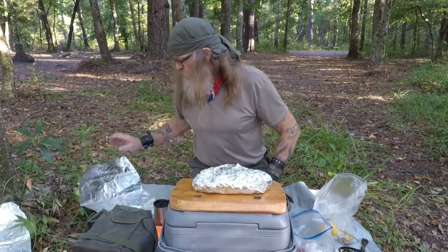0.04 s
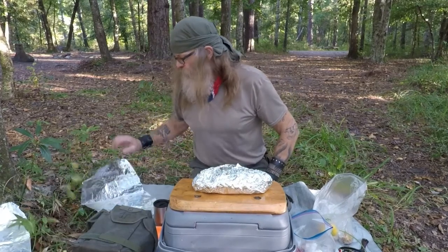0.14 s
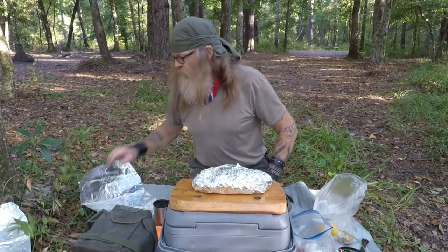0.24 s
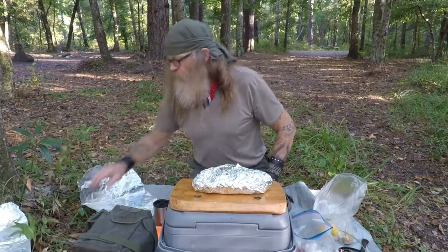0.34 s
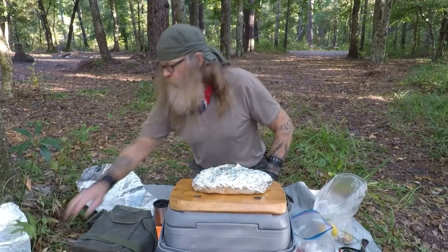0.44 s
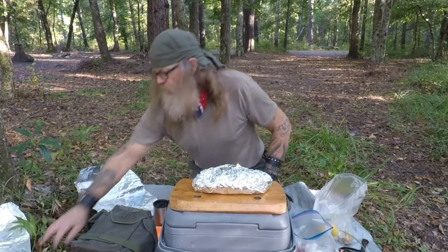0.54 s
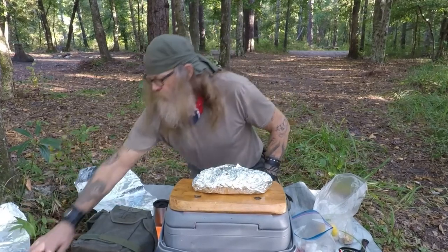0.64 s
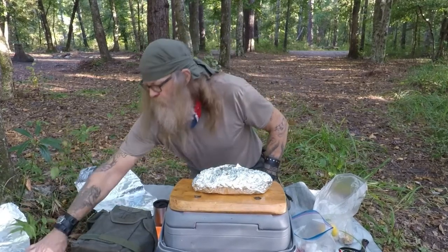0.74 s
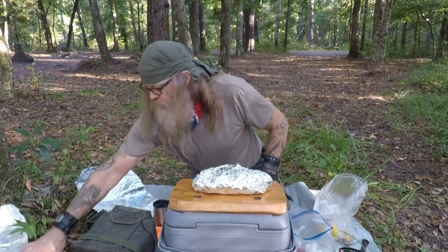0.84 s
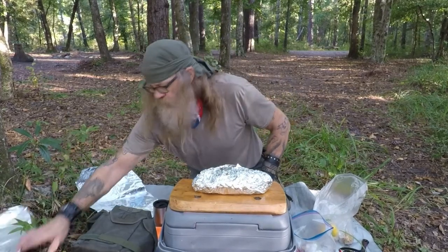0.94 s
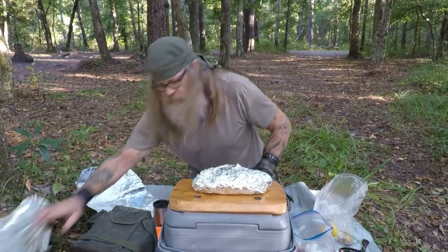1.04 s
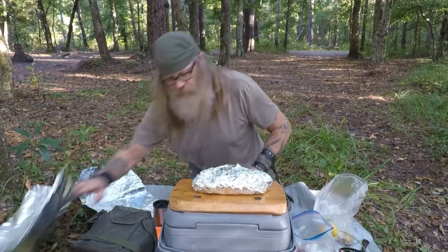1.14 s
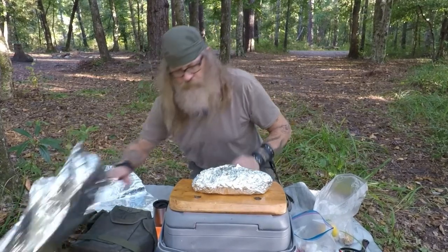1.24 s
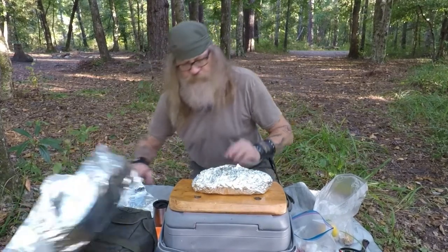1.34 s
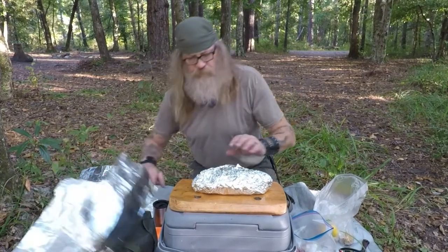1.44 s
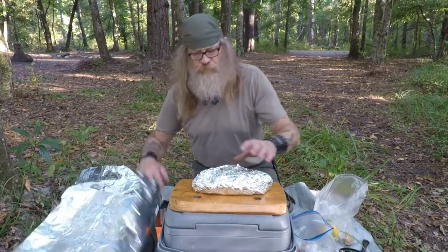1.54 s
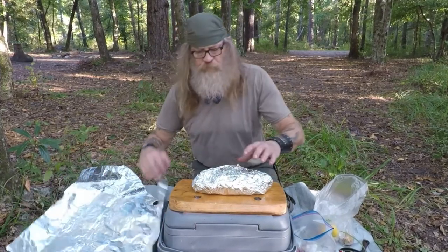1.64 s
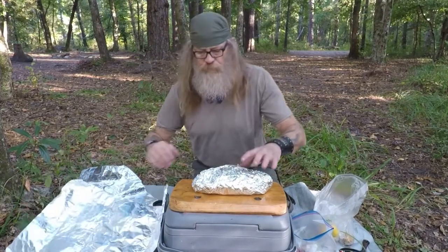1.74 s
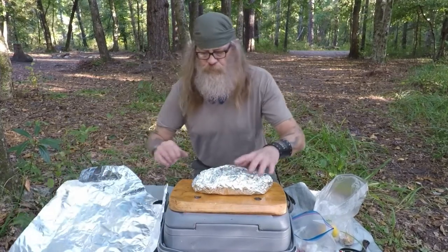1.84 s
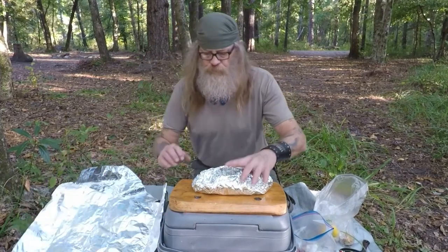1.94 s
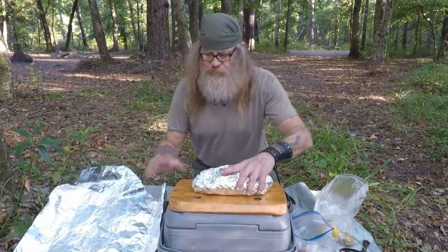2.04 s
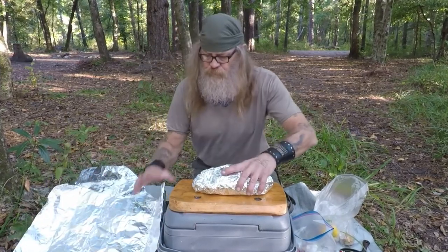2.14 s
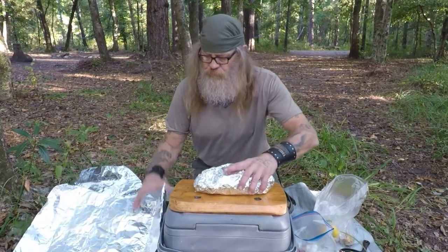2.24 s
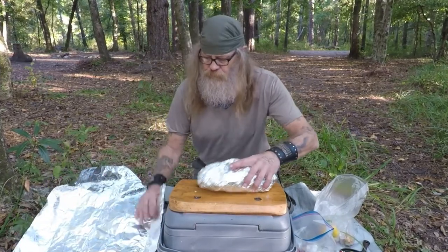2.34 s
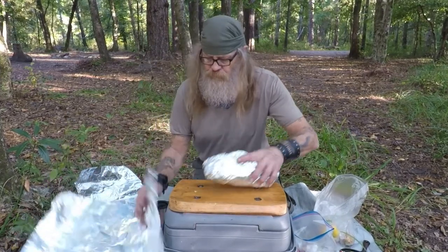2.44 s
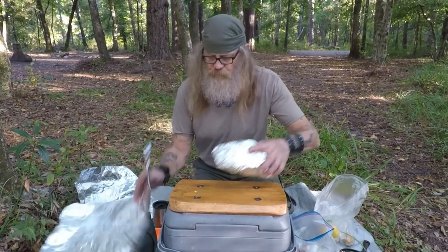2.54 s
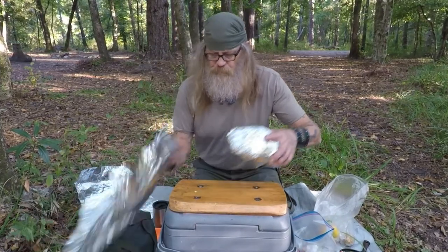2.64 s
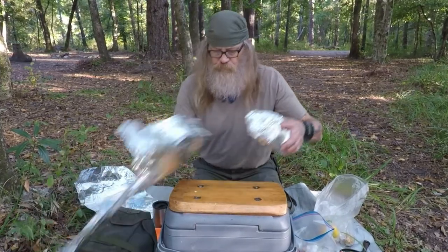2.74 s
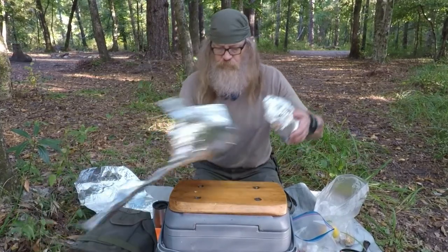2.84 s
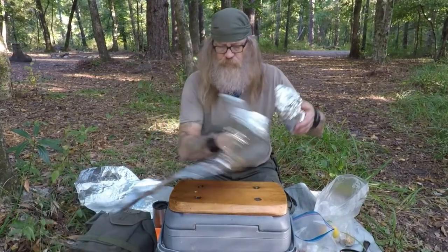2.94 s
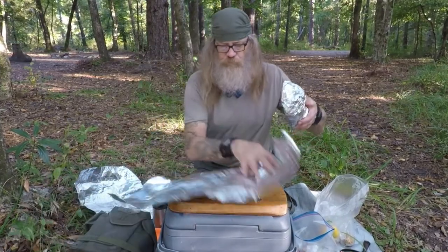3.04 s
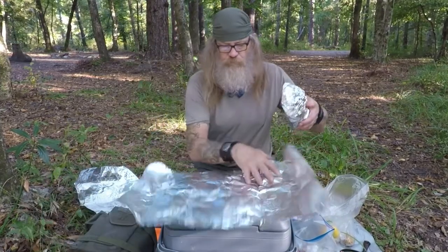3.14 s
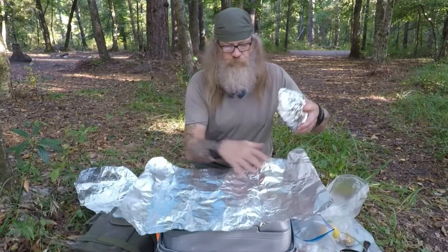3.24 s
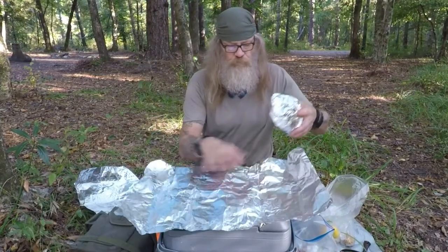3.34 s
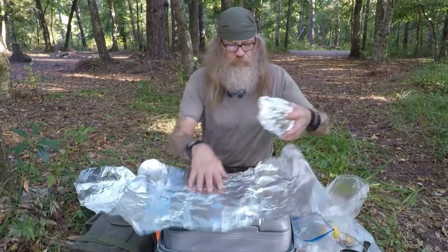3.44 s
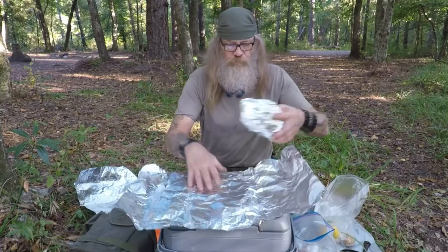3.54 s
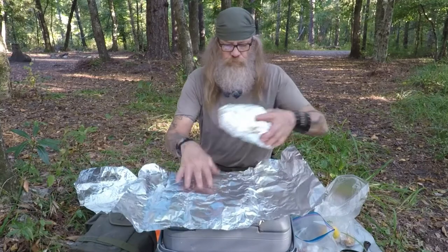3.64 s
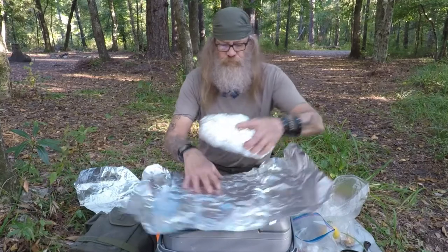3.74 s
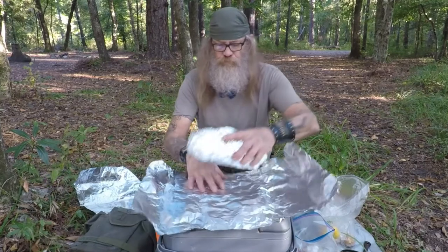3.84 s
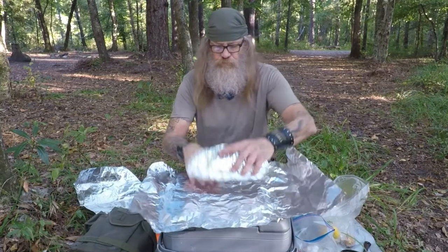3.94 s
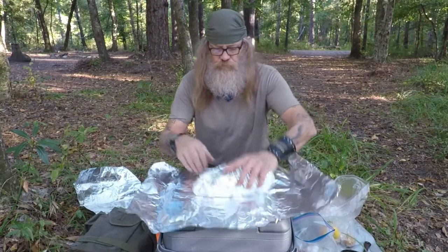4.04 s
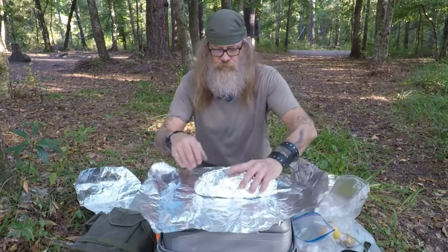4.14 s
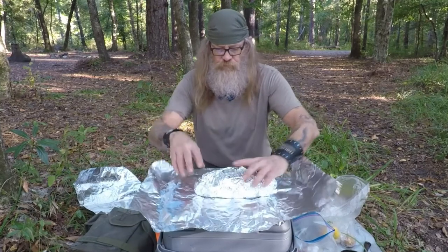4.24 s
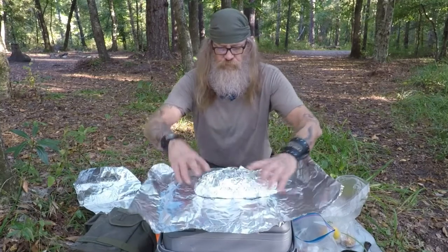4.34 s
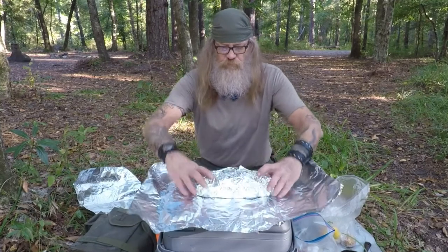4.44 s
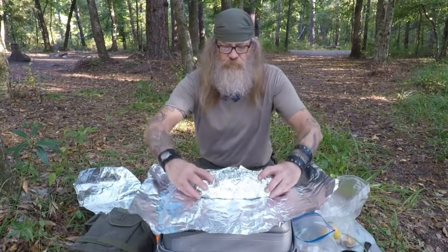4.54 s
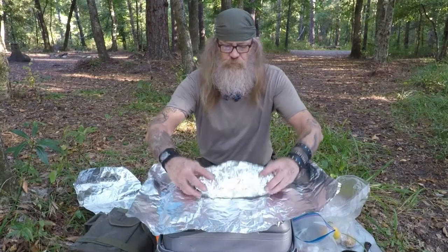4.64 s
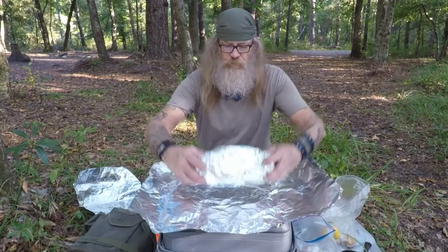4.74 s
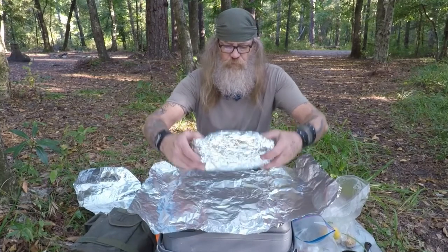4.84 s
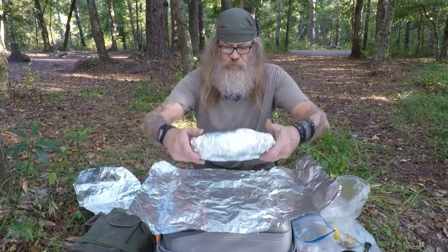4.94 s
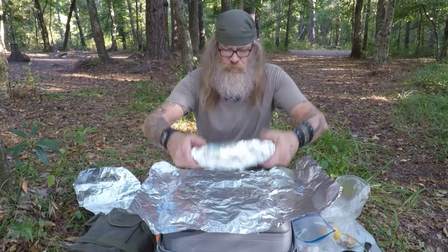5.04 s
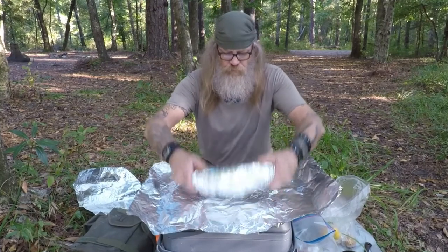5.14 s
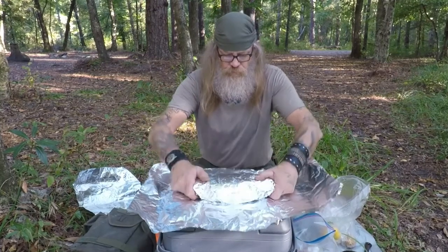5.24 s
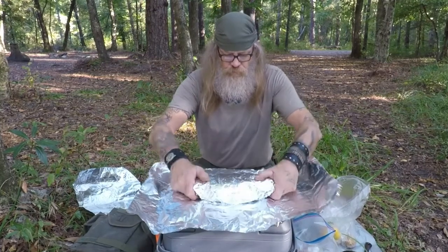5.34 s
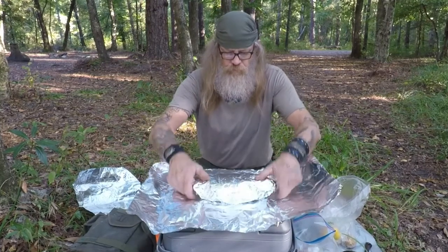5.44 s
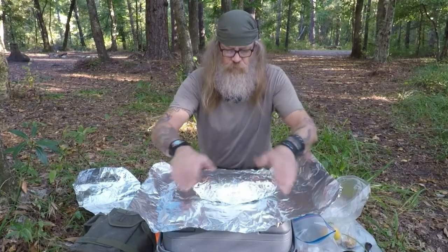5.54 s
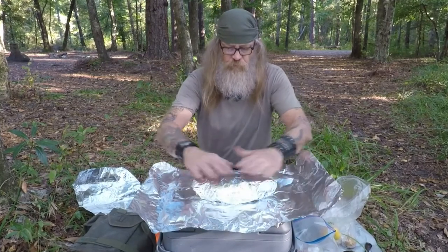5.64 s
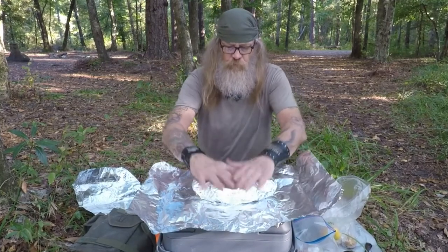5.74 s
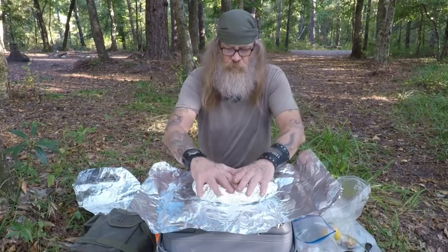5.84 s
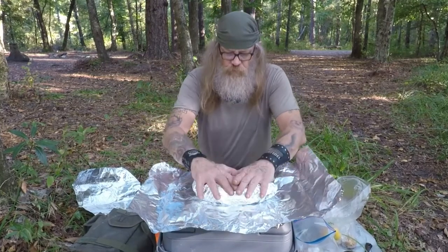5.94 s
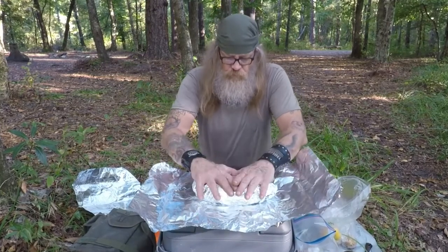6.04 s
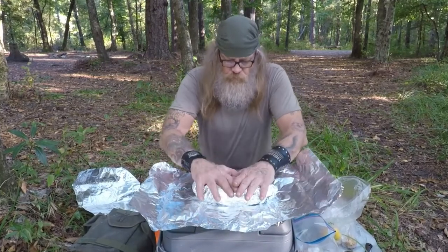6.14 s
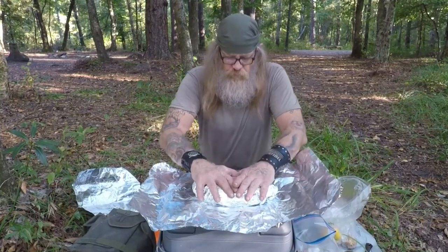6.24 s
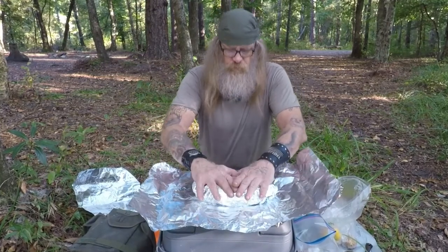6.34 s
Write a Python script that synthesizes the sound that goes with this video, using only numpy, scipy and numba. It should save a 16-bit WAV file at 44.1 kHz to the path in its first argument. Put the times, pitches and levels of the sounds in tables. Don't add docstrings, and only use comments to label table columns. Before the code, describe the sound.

Aluminium foil rustles and crackles as a sheet is dragged, spread over a board and pinched around a packet, with quiet woodland rumble beneath.

```python
import sys
import numpy as np
from scipy import signal
from scipy.fft import rfft, irfft, next_fast_len
from scipy.io import wavfile
from scipy.ndimage import uniform_filter1d
from numba import njit

SR = 44100
rng = np.random.default_rng(int(sys.argv[2]) if len(sys.argv) > 2 else 0)


def dump(signal):
    limited = np.clip(np.atleast_2d(signal).T, -1, 1)
    pcm = np.round(limited * 32767).astype(np.int16)
    wavfile.write(sys.argv[1], SR, pcm)


def elevation(decibels):
    levels = np.asarray(decibels, float)
    return 10 ** (levels / 20)


N = 281799

# (frequency [Hz], level [dB])
FOIL_TONE = [(76, -51), (130, -9), (201, -7.5), (403, -4.5), (540, -5), (1460, -5), (2260, -3),
             (2760, -5.5), (4300, -2), (6210, 1), (7400, -2.5), (8300, -8.5), (10000, -14.5), (12500, -34),
             (14900, -37.5)]
# (frequency [Hz], level [dB])
WOOD_SPECTRUM = [(76, -88), (130, 1), (250, -2), (587, -8.5), (790, -7.5), (1710, -17), (4100, -27.5),
                 (5200, -20.5), (6860, -27.5), (7430, -23), (14900, -40)]
# (frequency [Hz], likeness [-1 to 1], below 0 the ports are in opposite
WOOD_LIKENESS = [(60, 0.58), (130, 0), (290, -0.47), (630, -0.77), (1380, -0.72), (3010, 0.04), (6590, 0),
                 (14400, 0.01)]
# (frequency [Hz], phase [rad])
PORT_LEAD = [(10, -0.48), (860, 0.63), (2000, 0.86), (4650, -0.4), (6370, -0.87), (8270, -1.55),
             (12600, -1.45)]
# (frequency [Hz], left minus right [dB])
PORT_BALANCE = [(60, 2.0), (110, 17.5), (200, -7.5), (370, -5), (690, -3.5), (1260, -1.5), (2320, -4.5),
                (4260, 0), (7840, -3), (14400, -13.5)]
# (time [s], crackle level [dB], hold [s], release [s per 20 dB], slack [dB])
DRAG_STROKES = [(0.029, -39.5, 0.005, 0.1452, -10), (0.292, -57, 0.045, 0.04, 13),
                (0.357, -57.5, 0.0045, 0.5, -25), (0.496, -53.5, 0.011, 0.1, -5.5),
                (0.646, -59.5, 0.022, -6, -8), (0.767, -36.5, 0.0045, 0.5, -4),
                (0.873, -32, 0.033, 0.05, -17), (0.934, -29, 0.031, 0, -5), (1.0, -32, 0.07, 0.1743, 2),
                (1.162, -42, 0.023, 0.36, -14), (1.33, -42, 0.065, 0.1, -1.5), (1.51, -40, 0.045, 0.3, 0.5),
                (1.655, -36.5, 0.017, 0.03, 8), (1.702, -35.5, 0.011, 0.1, 6), (1.815, -51, 0.044, 0.1, -2),
                (0.167, -59.5, 0.071, .2, -8), (1.884, -46, 0.0066, 0.17, 1), (2.003, -43, 0.019, 0, 3.5),
                (2.05, -54.5, 0.17, 6, 2), (2.206, -51, 0.024, -0.5, -3), (2.32, -35.5, 0.019, 0.04, 11.5),
                (2.36, -33, 0.1, 0.05, 1.5), (2.48, -41.5, .04, 0.04, 2), (2.538, -34.5, 0.035, 0.14, 6),
                (2.595, -34, 0.031, 0.23, -16), (2.794, -37.5, 0.026, -0.07, -15),
                (2.922, -38, 0.0046, 0.02, -28), (0.074, -43.5, 0.0075, 0.2, -10),
                (2.971, -33.5, .005, 0.18, -17)]
# (time [s], crackle level [dB], hold [s], release [s per 20 dB], slack [dB])
PRESS_STROKES = [(3.364, -38, 0.038, .1, 15), (3.064, -27.5, 0.0077, 0.14, 6.5),
                 (3.14, -32.5, 0.038, 0.047, -4), (3.266, -46.5, 0.031, 0.072, -20),
                 (3.407, -21, 0.0022, 0.064, 5), (3.47, -42, 0.012, 0.13, 5.5),
                 (3.647, -25, 0.011, 0.12, 4.5), (3.725, -28, 0.015, 0.071, -2),
                 (3.8, -42.5, 0.065, .1, -4), (3.9, -38.5, 0.064, .1, -6), (4.009, -25.5, 0.018, 0.099, 2),
                 (4.18, -44, .005, 0.14, -9.5), (4.25, -46, 0.021, 0.11, 10),
                 (4.405, -41, 0.0042, 0.18, -3), (4.44, -41, .005, 0.36, 4), (4.95, -50, 0.06, 0.2, -6.5),
                 (5.14, -21.5, 0.021, 0.047, -2.5), (5.19, -34.5, 0.029, .03, -1),
                 (3.393, -29, .008, .05, 0), (5.238, -41.5, 0.004, 0.082, -12),
                 (5.27, -52.5, 0.054, 0.34, -4), (4.338, -44.5, 0.03, 0.13, 5),
                 (5.404, -45.5, 0.052, 0.073, 6.5), (5.708, -45.5, 0.03, 0.042, 5),
                 (5.78, -55, 0.096, 0.077, 3), (5.9, -51, 0.056, 0.93, -16), (6.23, -81, 0.18, 0.42, -17),
                 (4.51, -46.5, 0.058, 0.24, -1), (4.635, -47, 0.017, 0.028, -12.5),
                 (4.8, -52, 0.012, 0.043, 11), (5.936, -55, 0.014, 0.046, -17)]
# (time [s], left minus right [dB])
HAND_PLACE = [(0.0, 2), (.77, 4), (1.1, 4), (1.6, 1.5), (1.75, 0.5), (2.25, -1.5), (2.5, 2.5), (2.9, 0.5),
              (3.1, -2.5), (3.5, 0), (3.98, -2), (5.0, -0.5), (5.7, -1.7), (6.0, -2), (6.39, 0.5)]
# (time [s], peak level [dB], pitch [Hz], body level re peak [dB])
DRAG_CREASES = [(.03, -21, 4200, -25), (.744, -36, 5740, -25), (0.7612, -20, 5710, -20),
                (0.85, -30, 3020, -20), (0.8824, -34, 6100, -25), (.9293, -19, 6240, -21),
                (1.167, -16, 5200, -35), (1.2452, -26, 5950, -27.5), (1.3254, -35, 6270, -11),
                (1.505, -16.5, 6200, -26), (1.646, -23, 4370, -18.5), (1.659, -12, 6300, -14.5),
                (1.701, -12, 6900, -25), (1.9159, -32, 2300, -21), (1.9814, -42, 1200, -16),
                (1.996, -29, 6700, -11), (2.2804, -21, 5980, -25), (2.306, -23, 1800, -18),
                (2.5328, -24.5, 1240, -23), (2.6932, -19, 3130, -22), (2.7528, -25, 6700, -16),
                (2.7882, -21, 6000, -17), (2.9136, -17, 6400, -34), (1.4765, -36, 614, -20),
                (1.892, -25, 6760, -25), (2.2548, -40, 4920, -16)]
# (time [s], peak level [dB], pitch [Hz], body level re peak [dB])
PRESS_CREASES = [(2.9694, -8.5, 6170, -37), (3.042, -22, 4100, -18), (3.0624, -12.5, 6700, -6.5),
                 (3.1387, -11.5, 6740, -14), (3.261, -36, 2220, -36), (3.3562, -27, 1620, -8),
                 (3.39, -11, 4600, -14), (3.4048, -11, 5500, -16.5), (3.644, -7, 5750, -11.5),
                 (3.7194, -19, 6400, -7.5), (3.85, -18, 5660, -36), (3.895, -35.5, 5650, -7),
                 (3.928, -19.5, 6240, -19), (3.9961, -9, 5860, -14), (4.0062, -12, 2080, -12),
                 (4.0933, -23.5, 1220, -25), (4.1728, -18.5, 5800, -41), (4.243, -26, 2380, -24),
                 (4.332, -33, 4490, -15), (4.3603, -20, 5760, -31), (4.392, -15, 5000, -13),
                 (4.426, -11.5, 5380, -38.5), (4.4956, -28, 1900, -11), (4.9364, -26.5, 5700, -10.5),
                 (5.1317, -18, 5020, -29), (5.1423, -8, 1550, -27), (5.396, -25, 5810, -8),
                 (5.7024, -23.5, 6640, -18), (5.9214, -22, 2670, -40), (6.0835, -25.5, 5700, -21)]
# (time [s], peak level [dB], pitch
# [Hz], avalanche t60 [s])
TICKS = [(6.345, -29.5, 3000, 0.05), (2.0047, -29, 6900, 0.043), (3.6362, -38, 5280, .03),
         (3.9666, -14, 5800, 0.05), (4.476, -25, 1680, 0.014), (4.9206, -33.5, 3360, .023),
         (4.9943, -29.5, 2100, 0.02), (5.023, -26.5, 1440, 0.015), (5.057, -29.5, 5680, 0.0089),
         (5.133, -19, 5770, 0.033), (5.1525, -5, 1730, 0.037), (5.167, -11, 5800, 0.048),
         (5.2337, -12, 6000, 0.045), (5.4515, -26, 1280, 0.061), (5.71, -27.5, 2220, 0.036),
         (5.7283, -29, 2200, .015), (5.7432, -27.5, 5050, .015), (5.828, -30, 6060, .022),
         (5.845, -26, 6010, 0.045), (5.8536, -26.5, 3800, 0.034), (5.861, -40, 1960, 0.031),
         (5.874, -25.5, 1800, 0.0088), (5.936, -30, 6600, 0.032), (5.9733, -28, 6630, 0.025),
         (6.0002, -29, 2000, 0.026), (6.0318, -27, 3940, 0.085), (6.132, -30, 4000, 0.027),
         (6.1733, -29, 6260, 0.028), (6.18, -23, 6800, 0.016), (6.2074, -27.5, 2230, 0.01),
         (6.18, -13, 12600, .009), (5.9224, -16.5, 9200, 0.0084), (5.8332, -32, 6100, .012),
         (5.909, -37, 2200, .01), (5.9285, -35, 4500, .015), (5.944, -33, 6000, .03),
         (6.0935, -34, 6000, .025), (6.1005, -32.5, 2480, 0.012), (6.109, -36, 4500, 0.022),
         (6.2886, -46, 1570, 0.0091), (6.318, -48, 2050, .01), (6.356, -33, 4500, .012),
         (5.1372, -8, 5800, 0.039), (2.5405, -23, 1030, 0.036), (3.7205, -19, 2350, 0.038),
         (3.666, -20, 930, 0.021), (4.508, -20, 3300, 0.073), (4.545, -30, 5800, 0.044),
         (4.576, -29, 6000, 0.048), (3.379, -26, 1500, .04),
         (.895, -22, 6000, .02), (.931, -19, 6300, .03), (.947, -19, 7200, 0.026),
                (.955, -18, 6700, 0.026), (.978, -20.5, 5900, .02), (.993, -22, 6200, .02),
                (1.004, -21, 6500, .02), (1.014, -22, 3500, .02), (1.037, -17, 3800, .03),
                (1.045, -19, 5800, .03), (1.994, -31, 4500, .03), (2.001, -31, 3800, .02),
                (2.008, -28, 5500, .02), (2.022, -29, 5000, .03), (2.073, -37, 5300, .015),
                (3.409, -10, 5500, .02), (6.086, -29.5, 3400, 0.011), (6.133, -34.5, 1440, .02),
                (6.29, -33, 9000, .009), (5.86, -32, 5500, .015), (5.829, -33, 3600, .01),
                (2.6, -21, 6900, .03), (2.63, -23, 6800, .03), (2.66, -22, 6000, .03),
                (2.72, -29, 6000, .03), (2.349, -19, 6000, 0.022), (2.374, -19, 6700, .015),
                (2.436, -21, 6000, .02), (2.445, -20, 5000, .02), (2.462, -20, 6300, .02),
                (4.094, -23.5, 6000, 0.022), (4.127, -29, 6000, .015), (5.217, -21, 5300, .015),
                (1.01, -21, 4500, .01), (1.088, -22, 5800, .015), (.795, -22, 5500, .015),
                (1.12, -24, 5800, .02), (2.15, -36, 5500, .012), (1.8, -30, 6500, .012),
                (1.555, -27, 6300, .03), (5.146, -9.5, 1920, .03), (3.77, -21, 5800, .02),
                (2.752, -29.5, 1100, 0.0297)]
# (time [s], peak level [dB], pitch [Hz])
LANDINGS = [(1.477, -28.5, 556), (1.645, -26, 447), (1.7, -30, 400), (1.657, -41, 520), (1.09, -29, 350),
            (2.548, -29, 422), (3.413, -23, 302), (3.444, -26, 550), (3.72, -28, 540), (5.136, -15, 473),
            (5.165, -21, 210), (5.226, -31, 190), (3.064, -24, 320), (3.408, -24, 201), (3.648, -29, 216),
            (4.015, -25, 238), (5.145, -14, 197), (5.208, -28, 450), (5.712, -31, 474)]
# (time [s], peak level [dB], pitch [Hz], decay [cycles])
PANEL_RINGS = [
    (.031, -39, 870, 15),
    (.031, -39, 2000, 27),
    (.029, -32, 4250, 45),
]

WOOD_DB = -47.5
INSECT_HZ, INSECT_WIDTH_HZ, INSECT_DB = 7330, 380, -65.5
SNAPS_PER_S = 18000
SWARM = 24
TOP_HZ = 15000
PORT_GAP_S = .00004
HOLD_S, RUSH_S = 0.022, 0.008
DRAG_ATTACK_S, PRESS_ATTACK_S = 0.036, 0.023
MIDDLE_DB, FLAP_DB, MIDDLE_PER_SLACK = -5, -13, 0.07
DULLER_PER_DB = 0.224
AVALANCHE_T60_S, TICK_BODY_DB = .07, -35
BOARD_CYCLES = 1.35


def level(x, db):
    return x * elevation(db) / np.sqrt(np.mean(x ** 2))


def read(table, size):
    hz, value = np.transpose(table)
    return np.interp(np.log(np.fft.rfftfreq(size, 1 / SR) + 1), np.log(hz + 1), value)


def colour(x, table):
    cepstrum = irfft(np.log(elevation(read(table, 2048))))
    cepstrum[1:1024] *= 2
    cepstrum[1025:] = 0
    impulse = irfft(np.exp(rfft(cepstrum)))
    return signal.fftconvolve(x, impulse[None], axes=1)[:, :N]


def walk(rate):
    k = int(SR / rate)
    held = rng.standard_normal(N)[np.arange(N) // k]
    return 1.86 * uniform_filter1d(uniform_filter1d(held, k), k)


def wood():
    size = next_fast_len(N)
    hz = np.fft.rfftfreq(size, 1 / SR) + 1
    alike = np.clip(read(WOOD_LIKENESS, size), -1, 1)
    noise = rfft(rng.standard_normal((2, size)))
    mid, side = noise * elevation(read(WOOD_SPECTRUM, size)) * np.sqrt([1 + alike, 1 - alike])
    stereo = np.array([mid + side, mid - side])
    air, swell = 0, walk(0.15)
    for centre in 2. ** np.arange(6, 16):
        band = np.cos(np.pi / 2 * np.clip(np.log2(hz / centre), -1, 1)) ** 2
        flicker = elevation(.4 * swell + .9 * walk(8))
        air = air + flicker * irfft(stereo * band, size)[:, :N]
    wings = rfft(rng.standard_normal((2, size)))
    wings = wings * np.exp(-(2 * (hz - INSECT_HZ) / INSECT_WIDTH_HZ) ** 2)
    insects = irfft(wings, size)[:, :N] * elevation(.7 * walk(2.7))
    return level(air, WOOD_DB) + level(insects, INSECT_DB)


@njit
def ring(start, hz, cycles, left, right):
    out = np.zeros((2, N))
    for k in range(len(start)):
        turn = np.exp((2j * np.pi - 1 / cycles[k]) * hz[k] / SR)
        z, i = 1. + 0j, start[k]
        while abs(z) > .004 and i < N:
            out[0, i] += (left[k] * z).real
            out[1, i] += (right[k] * z).real
            z, i = z * turn, i + 1
    return out


def snaps(s, hz, cycles, db, pan_db, place, sign, soft=False):
    size = elevation(db) * np.sign(sign - .5) * (1j if soft else 1 + 0j)
    half = elevation(pan_db / 2) * np.exp(2j * np.pi * hz * PORT_GAP_S * place)
    start = np.clip(s * SR, 0, N - 1).astype(np.int64)
    return ring(start.ravel(), hz.ravel(), cycles.ravel(), (size * half).ravel(), (size / half).ravel())


def hands():
    t = np.arange(0, N / SR, .002)
    strokes = np.transpose(DRAG_STROKES + PRESS_STROKES)
    s, db, hold, release, slack = (column[:, None] for column in strokes)
    attack = np.repeat([DRAG_ATTACK_S, PRESS_ATTACK_S], [len(DRAG_STROKES), len(PRESS_STROKES)])[:, None]
    rise = np.maximum(s - t, 0) / attack
    fall = np.maximum(t - s - abs(hold), 0) / np.maximum(release, .02)
    power = elevation(2 * np.maximum(db - 20 * (rise + fall), -100))
    total = power.sum(axis=0)
    return t, 10 * np.log10(total), (power * slack).sum(axis=0) / total


def released(s, t, db):
    crease = np.sort([row[0] for row in DRAG_CREASES + PRESS_CREASES])
    k = np.searchsorted(crease, s)
    coming = crease[np.minimum(k, len(crease) - 1)]
    gone = crease[np.maximum(k - 1, 0)]
    now = np.interp(s, t, db)
    hold_from = np.maximum(coming - HOLD_S, np.minimum(gone + RUSH_S, s))
    stored = np.minimum(now, np.interp(hold_from, t, db))
    held = np.where(abs(coming - s) < HOLD_S, stored, now)
    rush = np.maximum(now, np.interp(gone + RUSH_S, t, db) - 1.0)
    return np.where(abs(s - gone) < RUSH_S, rush, held)


def crackle():
    count = int(SNAPS_PER_S * N / SR)
    when, facet, long, big, place, sign = rng.random((count, 6)).T
    s = when * N / SR
    hz = 120 + TOP_HZ * facet ** 1.5
    cycles = .5 + 0.87 * long ** 2
    t, high_db, slack_db = hands()
    eased_db = DULLER_PER_DB * np.clip(-29.0 - high_db, 0, 25)
    middle_db = MIDDLE_DB + MIDDLE_PER_SLACK * slack_db + eased_db
    flap_db = FLAP_DB + slack_db + eased_db
    middle = np.interp(s, t, middle_db + 7.0)
    flap = np.interp(s, t, flap_db + 11.0)
    octave = np.log2(hz / 1700)
    above = middle * np.clip(1 - octave / 1.93, 0, 1)
    below = middle + (flap - middle) * np.clip(-octave / 3.2, 0, 1)
    tilt_db = np.where(octave > 0, above, below)
    even_db = 20 * np.log10((hz / 5000) ** (2 / 3) / cycles ** .5)
    clump_db = .65 * walk(150)[(s * SR).astype(int)]
    work_db = released(s, t, high_db)
    spread_db = np.clip(1.2 - 0.067 * (work_db + 41.0), 1.8, 2.5)
    size_db = -spread_db * np.log(1 - big) + 10 * np.log10(1 - spread_db * np.log(10) / 10)
    db = work_db + size_db + tilt_db + even_db + clump_db + 4.5
    pan_db = np.interp(s, *np.transpose(HAND_PLACE)) + 0.5 + 4.9 * (place - .5)
    return snaps(s, hz, cycles, db, pan_db, place - .5, sign)


def panel():
    s, peak_db, hz, cycles = np.transpose(PANEL_RINGS)
    return snaps(s, hz, cycles, peak_db, 0 * s, 0, np.ones(len(s)), soft=True)


def all_creases():
    large = [(s, db, hz, AVALANCHE_T60_S, body) for s, db, hz, body in DRAG_CREASES + PRESS_CREASES]
    return np.array(large + [row + (TICK_BODY_DB,) for row in TICKS])


def creases():
    s, peak_db, hz, t60, body_db = (column[:, None] for column in all_creases().T)
    late, facet, long, big, place, sign = np.moveaxis(rng.random((len(s), SWARM, 6)), 2, 0)
    s, t60 = s + .0007, np.clip(t60, .008, .09)
    pan_db = np.interp(s, *np.transpose(HAND_PLACE)) - 1.1 + 4.0 * (place[:, :1] - .5)
    one, first_sign = np.ones_like(s), sign[:, :1]

    late = late ** 1.4 * .5 * t60
    pitch = np.minimum(hz * 2 ** (2.15 * facet ** 1.44 - .75), TOP_HZ)
    swarm_db = peak_db - 60 * late / t60 + 4.4 * (big - .5) - 11.5 + 80 * t60
    swarm_pan_db = pan_db - 2.0 + 4.3 * (place - .5)
    swarm = snaps(s + 0.000955 + late, pitch, .5 + 2.0 * long, swarm_db, swarm_pan_db,
                  place - .5, sign, soft=True)

    peak_db = peak_db + 6.0 - 150 * t60
    click = snaps(s, hz, 1.6 * one, peak_db, pan_db + 1.5, 0, first_sign, soft=True)
    edge_hz = np.minimum(1.2 * hz, 9000)
    edge = snaps(s, edge_hz, .3 * one, peak_db - .8 - 70 * t60, pan_db + 1.5, 0, first_sign)
    thump_hz = 300 * 2 ** (1.5 * facet[:, :1])
    thump = snaps(s + 0.00085, thump_hz, 1.3 * one, peak_db + body_db + 3.5, pan_db, 0, first_sign, soft=True)
    return click + edge + swarm + thump


def board():
    s, peak_db, hz = np.transpose(LANDINGS)
    one = np.ones(len(s))
    return snaps(s, hz, BOARD_CYCLES * one, peak_db, 0 * s, 0, one, soft=True)


def shimmer(x, sheet_t60, sheet_db, trunk_t60, trunk_db, alike):
    hop, size = 1024, 8192
    t = np.arange(size - 2 * hop) / SR
    shape = 0
    for t60, db in ((sheet_t60, sheet_db), (trunk_t60, trunk_db)):
        shape = shape + elevation(db) * 1000. ** (-t / t60) / np.sqrt(t60 * SR / np.log(1e6))
    alike = np.clip(alike, 0, 1)
    starts = np.arange(0, N + hop, hop)
    mid, side = rng.standard_normal((2, len(starts), len(t))) * shape
    tails = np.sqrt((1 + alike) / 2) * mid + np.sqrt((1 - alike) / 2) * np.array([side, -side])
    span = np.arange(2 * hop)
    fade = np.sin(np.pi * span / (2 * hop))
    moments = np.pad(x, ((0, 0), (hop, size)))[:, starts[:, None] + span] * fade
    rung = irfft(rfft(moments, size) * rfft(tails, size))
    out = np.zeros((2, N + 2 * size))
    for k, i in enumerate(starts):
        out[:, i:i + size] += rung[:, k]
    return out[:, hop:hop + N]


def foil():
    close = crackle() + panel() + creases() + board()
    tails = shimmer(close, sheet_t60=0.021, sheet_db=-10, trunk_t60=0.21, trunk_db=-14.5, alike=0.99)
    size = next_fast_len(N)
    spectrum = rfft(colour(close + tails, FOIL_TONE), size)
    half = elevation(read(PORT_BALANCE, size) / 2) * np.exp(.5j * read(PORT_LEAD, size))
    return irfft(spectrum * np.array([half, 1 / half]), size)[:, :N]


def scene():
    return wood() + foil()


def top_cut(x):
    return signal.sosfilt(signal.butter(12, 15020, fs=SR, output="sos"), x)


def record(dry):
    rounded = np.tanh(1.3 * dry) / 1.3
    cut = signal.sosfilt(signal.cheby2(8, 41, 111, "high", fs=SR, output="sos"), rounded)
    cut = signal.sosfilt(signal.ellip(8, .3, 60, TOP_HZ, fs=SR, output="sos"), cut)
    shared, own = rng.standard_normal(N), rng.standard_normal((2, N))
    bass = signal.butter(3, [16, 78], "band", fs=SR, output="sos")
    rumble = level(signal.sosfilt(bass, shared + 0.32 * own), -74.5)
    sway = signal.butter(2, [45, 110], "band", fs=SR, output="sos")
    swing = elevation(-7.5) * signal.sosfilt(sway, cut ** 2)
    return top_cut(cut + rumble + swing)


dry = scene()
out = record(dry)
dump(out)
```